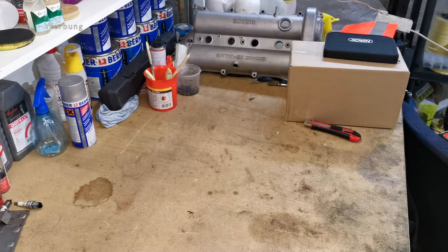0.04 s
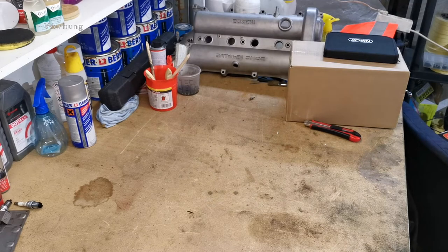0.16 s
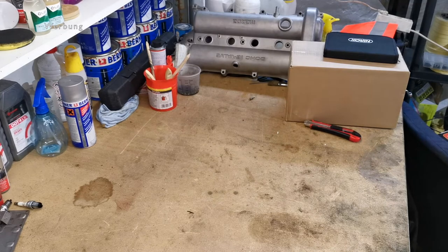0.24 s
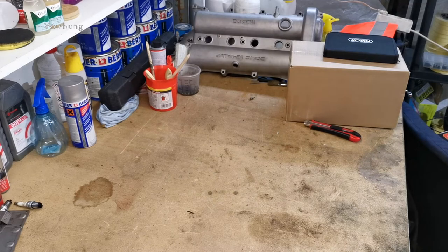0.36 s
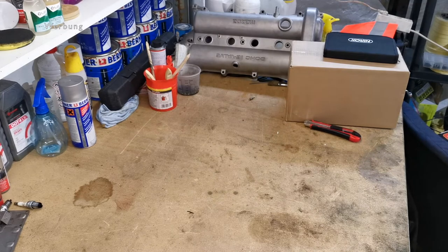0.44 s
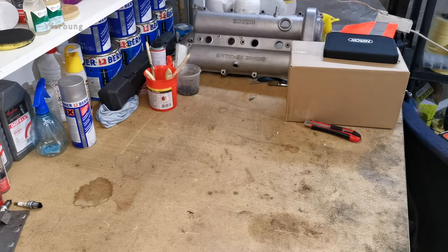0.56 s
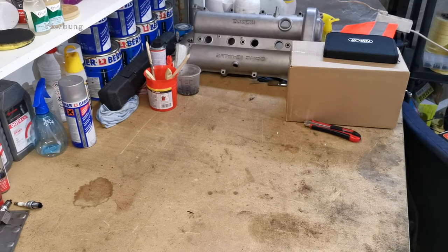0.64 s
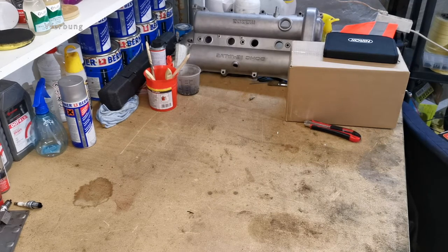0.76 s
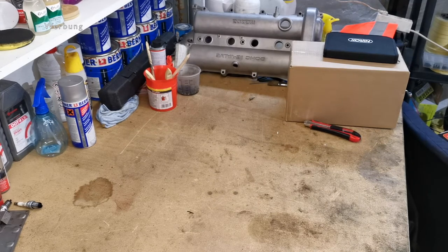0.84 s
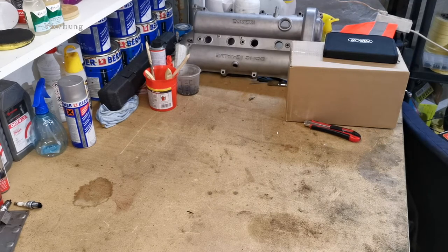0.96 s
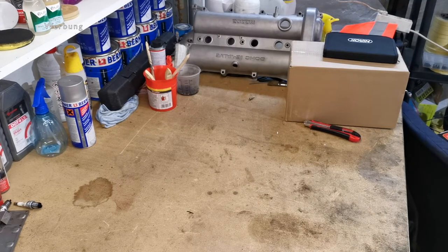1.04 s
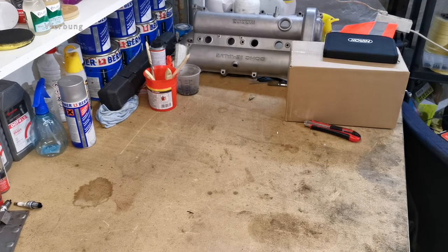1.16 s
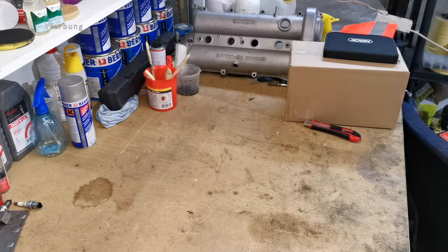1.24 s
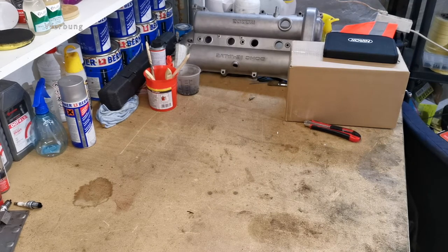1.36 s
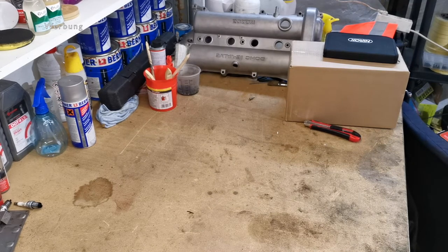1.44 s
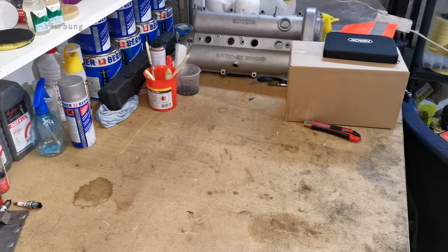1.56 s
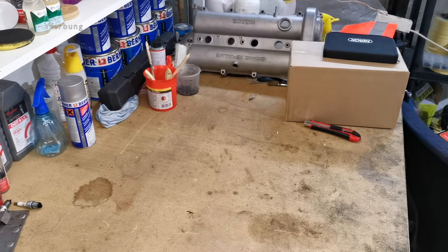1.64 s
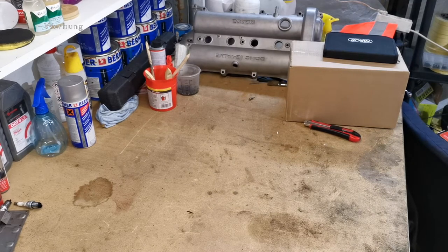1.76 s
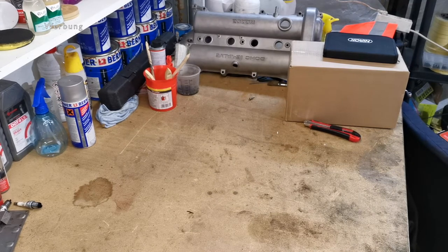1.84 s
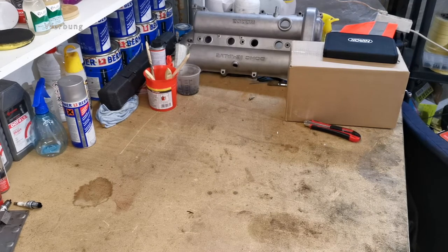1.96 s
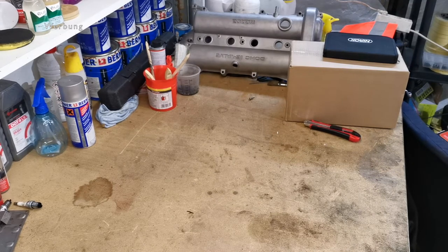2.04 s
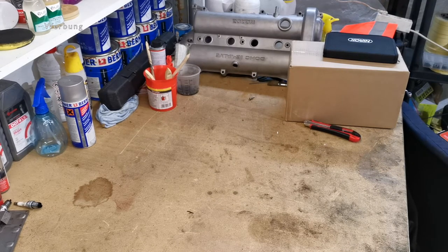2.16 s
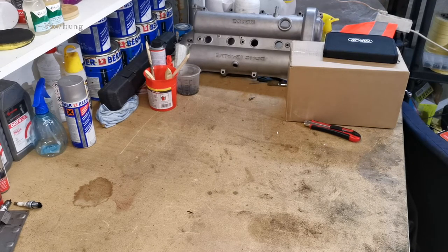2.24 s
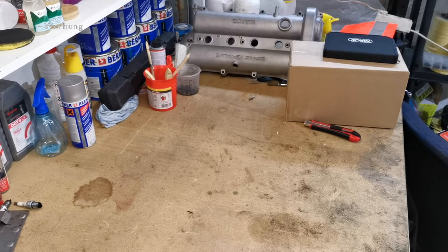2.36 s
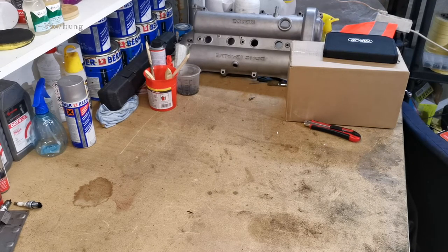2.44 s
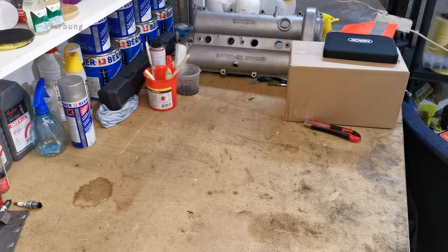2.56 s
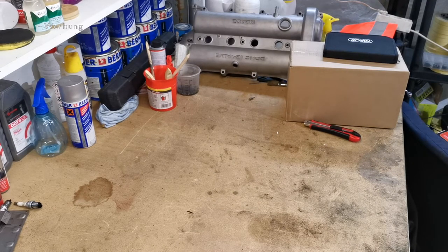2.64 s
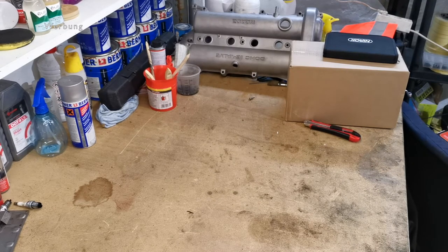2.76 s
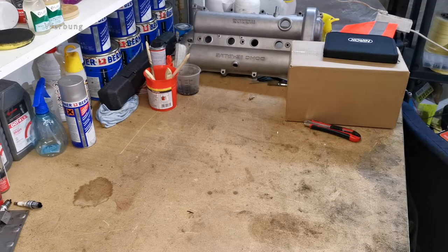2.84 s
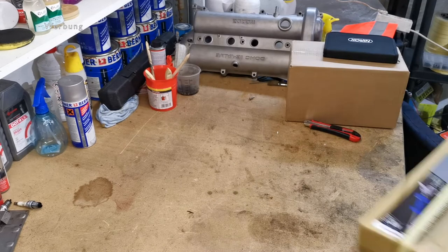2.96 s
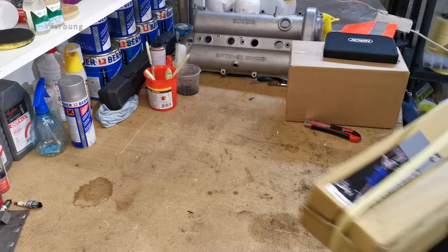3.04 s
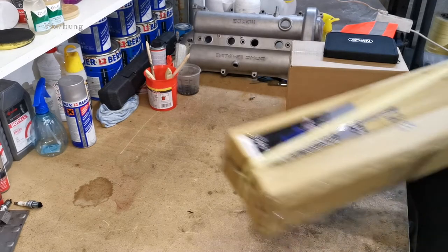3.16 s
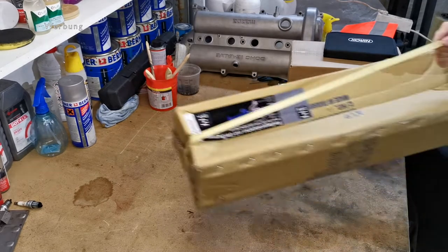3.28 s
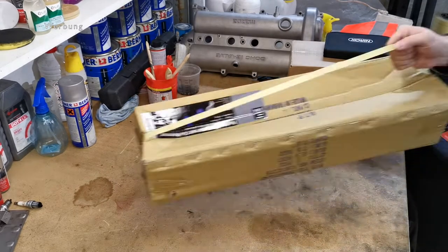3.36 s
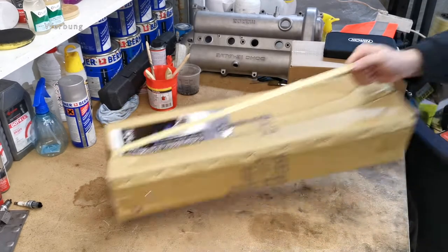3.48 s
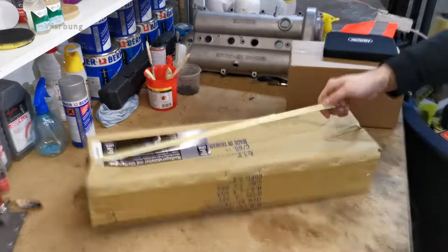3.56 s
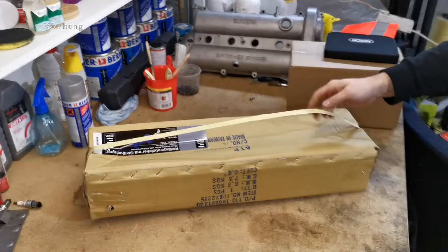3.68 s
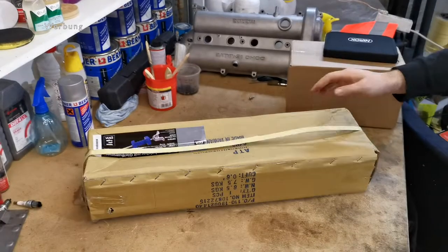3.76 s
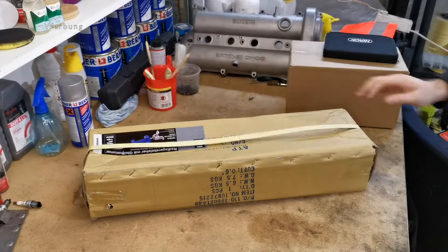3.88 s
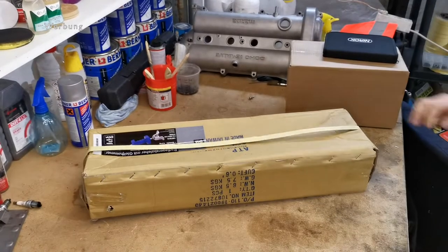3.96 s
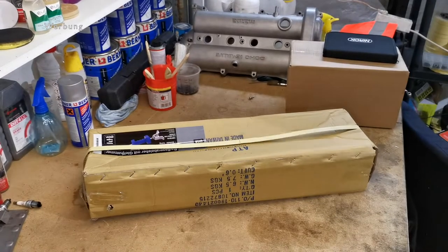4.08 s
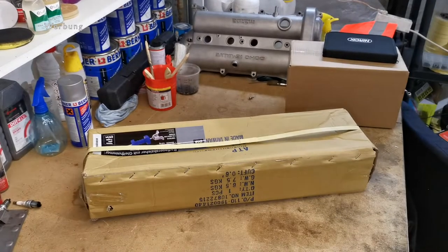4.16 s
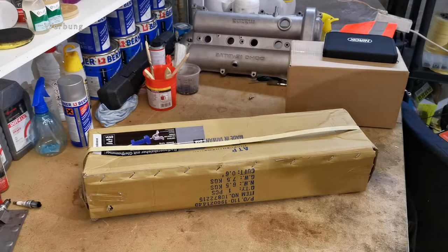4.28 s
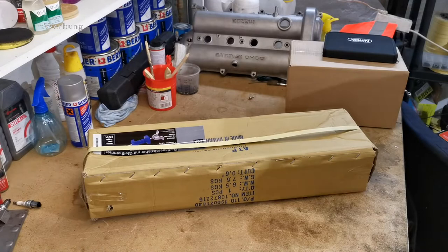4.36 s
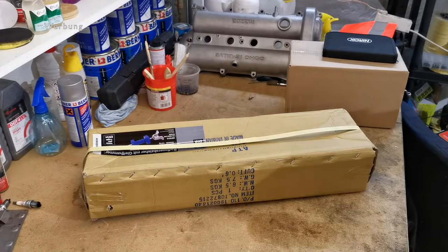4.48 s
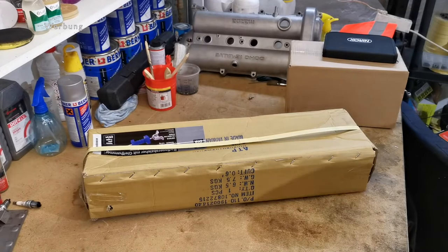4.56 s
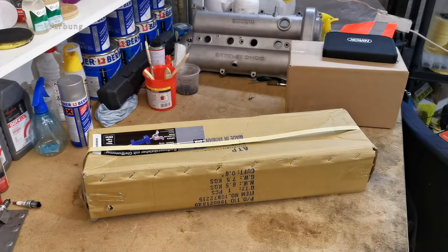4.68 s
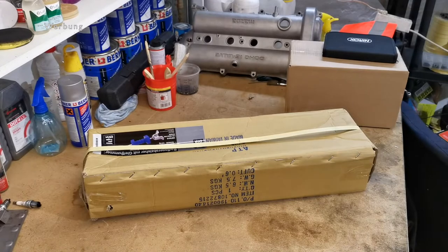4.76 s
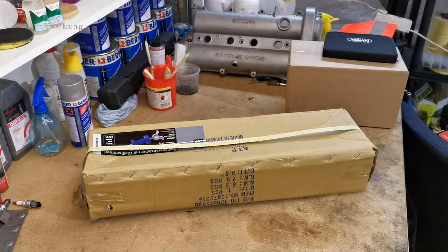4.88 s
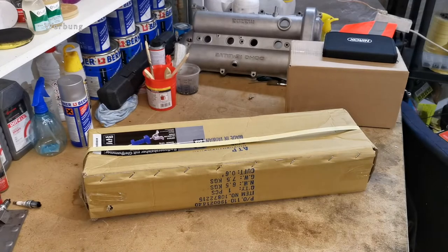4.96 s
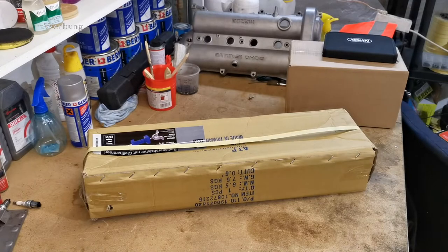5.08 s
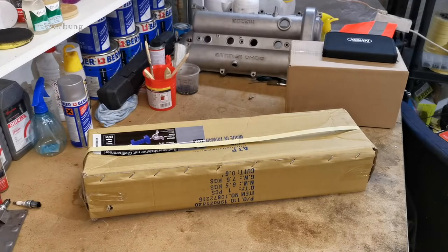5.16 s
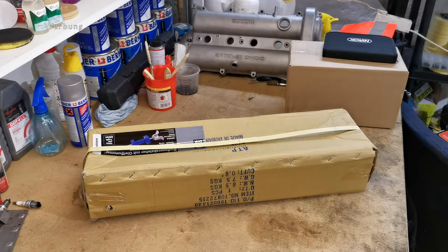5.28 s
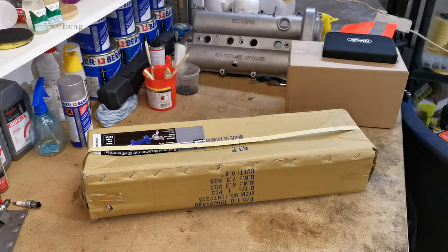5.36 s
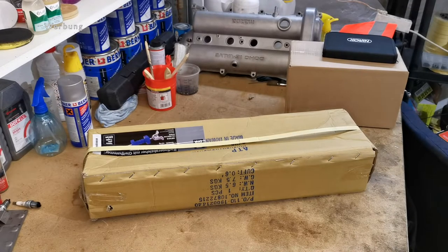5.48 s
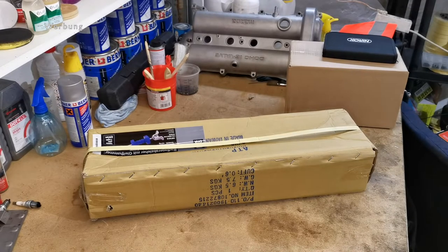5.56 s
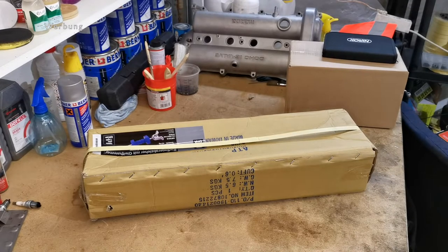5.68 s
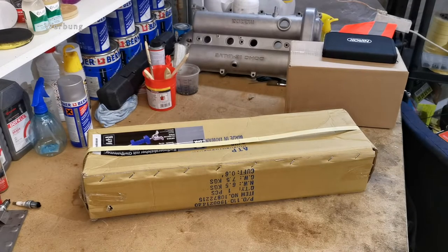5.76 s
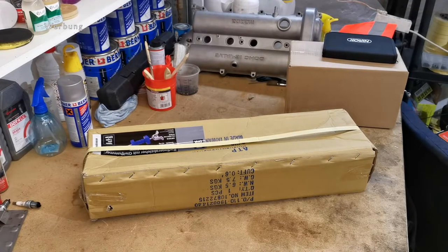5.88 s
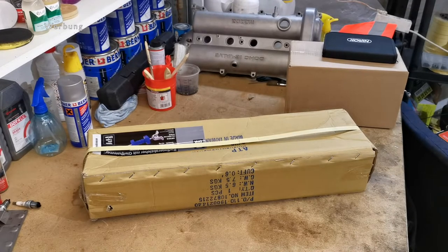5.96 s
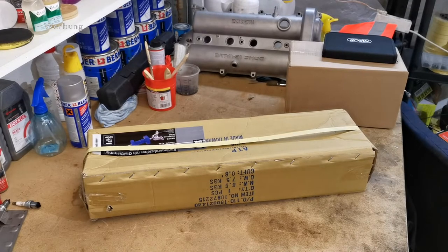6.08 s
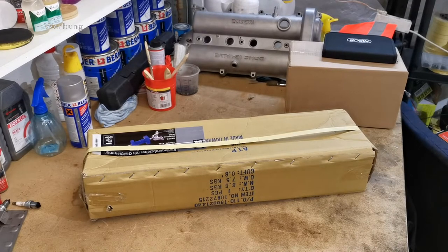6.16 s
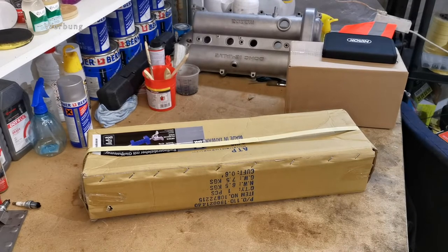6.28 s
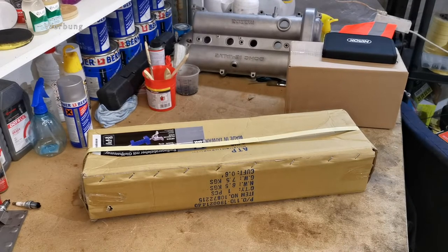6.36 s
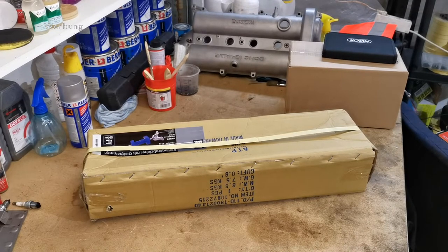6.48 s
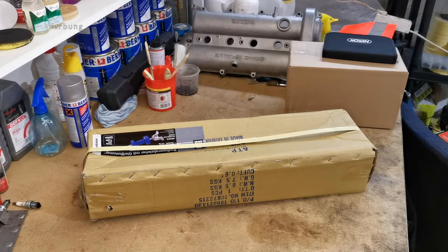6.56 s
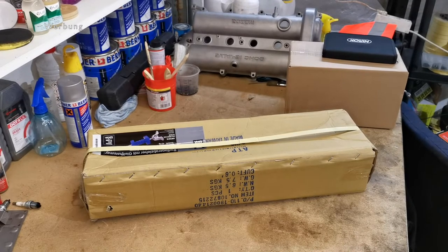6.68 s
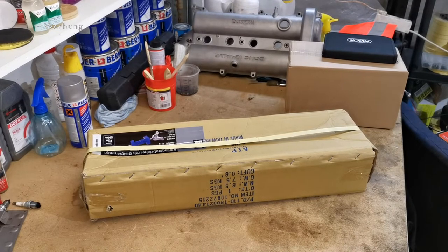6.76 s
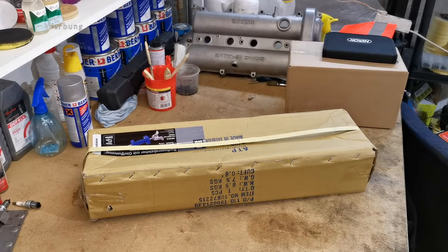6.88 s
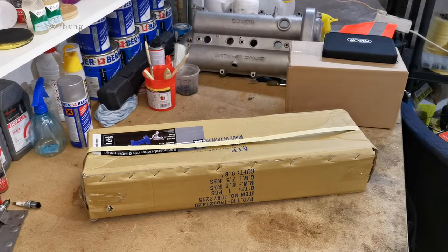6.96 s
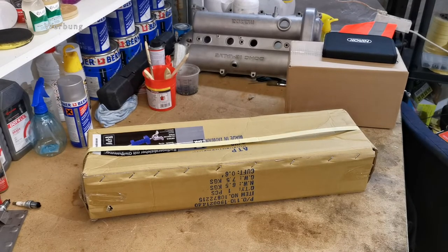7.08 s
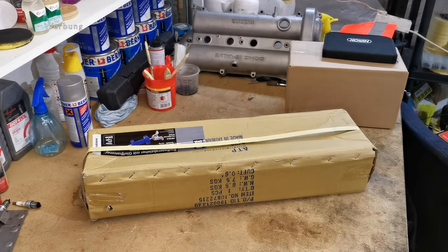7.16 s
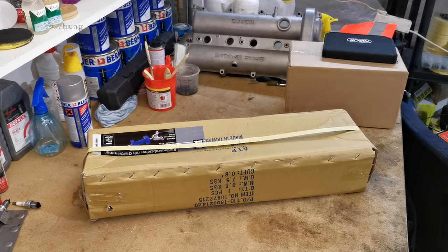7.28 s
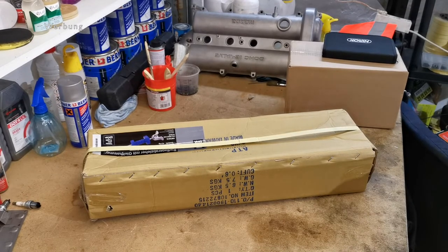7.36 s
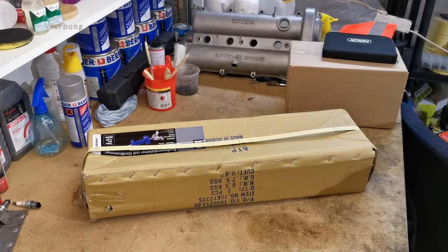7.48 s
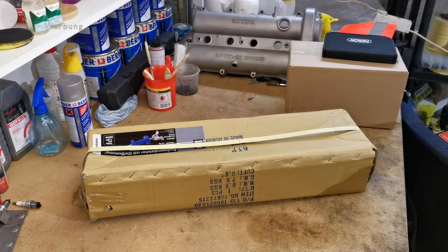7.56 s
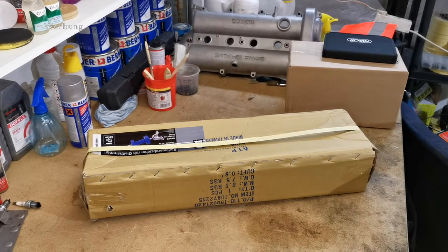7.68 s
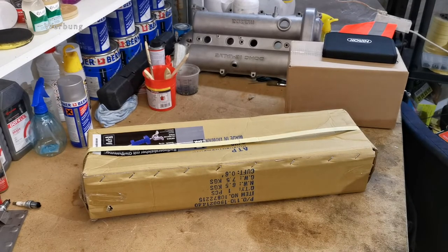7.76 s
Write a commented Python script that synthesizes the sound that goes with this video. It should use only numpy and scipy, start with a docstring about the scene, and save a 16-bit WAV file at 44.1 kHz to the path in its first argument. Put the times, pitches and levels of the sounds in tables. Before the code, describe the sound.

Close microphone in a quiet garage. Out of view, cardboard cartons scrape, bump hollowly and rustle for nearly three seconds, then fall almost silent. A long heavy carton slams onto a wooden workbench in a quick double blow, distorting the microphone and jangling tools. Cans ring faintly on. After a short lull, brighter cardboard rustling, sliding and crackling returns, then thins out.

```python
"""In a garage, cartons are dragged, bumped and rustled; a long heavy one lands on a wooden workbench,
one end first, bounces, and sets cans and tools ringing. Sliding is stick-slip noise through resonant
colours; knocks and blows are decaying noise bursts that excite damped modes; the cans ring on with slow
beats. A diffuse tail follows, over quiet air and low sway; the close microphone overloads on the landing."""
import sys
import numpy as np
from scipy import signal
from scipy.fft import rfft, irfft
from scipy.io import wavfile

SR = 44100
rng = np.random.default_rng(int(sys.argv[2]) if len(sys.argv) > 2 else 0)


def store_wav(level_fs):
    """Save 16-bit WAV to argv[1]."""
    pcm = np.round(np.clip(np.atleast_2d(level_fs), -1, 1) * 32767)
    wavfile.write(sys.argv[1], SR, pcm.T.astype(np.int16))


N = 345303

# Quiet garage air. Each row: frequency in Hz, relative spectral level in dB per Hz.
AIR_SPECTRUM = [(15, -19.5), (25, -2.5), (44, -30.5), (122, -17), (164, -32), (410, -18), (762, -23),
                (826, -20), (896, -22.5), (15500, -38)]
AIR_DB, SWAY_FLOOR_DB = -61, -79  # levels of the air and of the steady rumble
# Jolts that set the floor or the bench legs swaying under the microphone.
# Each row: start of full level in seconds, level in dB, hold in seconds, pitch in Hz.
JOLT_SWAYS = [(0.024, -65, 0.12, 43), (.76, -57, .37, 41), (1.39, -57, .1, 40), (2.064, -46, 0.098, 43),
              (2.815, -58, 0.03, 41), (3.61, -19, 0.022, 23), (3.62, -31, .04, 48), (3.95, -44, 0.14, 20),
              (4.6, -67, 0.25, 16.3), (4.995, -69, .05, 40), (5.77, -58, .01, 30), (6.145, -71, .05, 40),
              (6.5, -62, .01, 47), (7.703, -57.5, 0.027, 37)]
JOLT_RISE_S, JOLT_FALL_S = .05, 0.27  # each spans 20 dB

# Strokes of cardboard sliding. Each row: start of full level in seconds, hiss level in dB, rise in seconds
# per 20 dB, hold in seconds, fall in seconds per 20 dB, weight (hollow body over hiss) in dB.
SLIDING_STROKES = [(.01, -57, 0.03, 0.011, 0.16, 4), (.092, -43, 0.019, 0.011, 0.043, 3.5),
                   (.13, -56.5, .02, 0.014, 0.23, 5.5), (.38, -62, 0.049, 0, 0.92, 3),
                   (.564, -47.5, 0.0055, 0.0078, 0.042, -11), (.622, -49, 0.051, 0, 0.29, -7),
                   (.742, -36.5, 0.0034, 0.0011, 0.067, 9.5), (0.787, -43.5, 0.087, .13, 0.14, 0.5),
                   (0.945, -41.5, .08, 0.052, 0.12, -0.3), (1.07, -50, 0.049, 0.061, 0.14, 2.5),
                   (1.181, -42.5, .09, 0.026, 0.062, -.6), (1.245, -31.5, 0.021, 0.056, 0.22, -6.5),
                   (1.506, -40, 0.091, 0.15, 0.12, -.6), (1.63, -45, 0.076, 0.053, 0.11, 3),
                   (1.843, -36.5, 0.17, 0.0049, .21, -8), (1.946, -45, 0.012, 0, .08, -3),
                   (2.003, -35, 0.017, 0.031, 0.2, 5), (2.056, -31, 0.066, 0, 0.042, -13),
                   (2.153, -42, 0.1, 0, 0.37, -9), (2.43, -51, 0.21, 0.016, .13, -8),
                   (2.518, -49.5, 0.04, 0.067, 0.2, -3), (2.686, -50, .11, 0.034, 0.058, -5.5),
                   (2.73, -35, 0.017, 0, 0.048, -8.5), (2.765, -48.5, 0.025, 0.029, 0.17, -4.5),
                   (2.806, -46, .05, 0, 0.24, -8), (2.96, -57, 0.13, 0.018, 0.056, 5),
                   (3.02, -44, 0.014, 0.0067, 0.02, 3.5), (3.06, -66.5, .05, 0.085, 0.19, -1),
                   (3.29, -71, 0.086, 0, 0.2, 1), (3.381, -60, 0.0062, 0.01, .095, 8.5),
                   (3.501, -64, 0.045, 0, 0.013, 14.5), (4.857, -48.5, 0.021, 0.014, .05, -8.5),
                   (4.913, -33, 0.041, 0.064, 0.13, -10.5), (4.997, -30, 0.046, .03, .11, -19),
                   (5.061, -24.5, 0.075, 0.027, 0.13, -19.5), (5.172, -30.5, 0.17, 0, 0.11, -11.5),
                   (5.339, -29.5, 0.25, 0, 0.17, -15), (5.478, -43, .012, 0.027, .11, -17),
                   (5.534, -41.5, 0.23, 0.052, 0.28, -7), (5.707, -37, 0.061, 0.027, 0.19, -6),
                   (5.865, -46, 0.26, 0.16, .3, -29), (6.071, -31, 0.38, 0.21, 0.16, -9.5),
                   (6.364, -39, 0.26, 0.18, 0.27, -7.5), (6.61, -44, 0.1, 0, 0.13, -13),
                   (6.715, -40, 0.0072, 0, 0.052, -15.5), (6.838, -51.5, 0.063, 0.089, 0.13, -0.5),
                   (7.113, -59, 0.54, 0.008, .25, -17), (7.245, -43, 0.061, 0, 0.16, -14),
                   (7.315, -53.5, 0.015, 0, 0.27, -3.5), (7.537, -53.5, 0.39, 0, 0.19, -3),
                   (7.676, -45, 0.054, .15, .11, -6)]
# A heavier stroke scrapes more coarsely and thuds more in the floor: dB over hiss at weight 0, dB per dB.
SCRAPE_DB, SCRAPE_PER_WEIGHT, THUD_DB, THUD_PER_WEIGHT = -0.25, 0.41, -13, 1.5
# Fine hiss of sliding. Each row: frequency in Hz, relative spectral level in dB per Hz.
HISS_SPECTRUM = [(1410, -27), (2400, 1), (4890, -1.5), (5800, -0.5), (7740, -5), (8710, -5), (10100, -11),
                 (14500, -19), (15500, -19)]
# Coarser scrape of sliding. Each row: frequency in Hz, relative spectral level in dB per Hz.
SCRAPE_SPECTRUM = [(350, -58.5), (600, -1.5), (758, -2), (1210, 1), (1420, 1), (2600, -7.5), (3380, -42),
                   (5720, -120)]
# Carton walls under rubbing. Each row: frequency in Hz, relative spectral level in dB per Hz.
WALL_SPECTRUM = [(94, -37.5), (160, -11), (259, -2.5), (505, -4), (599, -3.5), (650, -4), (840, -38),
                 (1430, -120)]
# Floor under the cartons. Each row: frequency in Hz, relative spectral level in dB per Hz.
FLOOR_SPECTRUM = [(45, -28), (70, -2), (130, -2), (190, -27.5)]
# Small patches of corrugated board that ring when they slip. Each entry: frequency in Hz.
FLUTE_PITCHES = [779, 954, 1160, 1460, 1590, 2180]
# Gain of the top treble in the hiss. Each row: time in seconds, gain in dB.
SHEEN_GAINS = [(0, .6), (.6, 1), (.9, -.6), (1.26, -4), (1.5, 4.5), (1.9, -7), (2.1, 2.5), (2.5, -1),
               (2.75, -15), (2.93, -7), (3.298, 0), (4.9, -0.5), (5.3, 4.5), (5.7, 0), (6.1, 1),
               (6.499, 3.3), (7, -5.3), (7.399, 6.7), (7.83, -3.5)]
SHEEN_HZ = 10000  # the gain acts above this
# Soft rustles as things settle. Each row: centre in seconds, level in dB, spread in seconds.
SETTLING_RUSTLES = [(3.96, -55, 0.06), (4.066, -50.5, 0.018), (4.17, -55.5, 0.025), (4.48, -55, 0.0055)]
# Carton walls groaning at one pitch while they stick and slide.
# Each row: centre in seconds, level in dB, pitch in Hz, spread in seconds, 60 dB decay in seconds.
WALL_GROANS = [(1.056, -37, 2470, 0.0046, 0.022), (1.52, -51, 277.7, 0.015, 0.18),
               (1.675, -39.5, 390, .015, 0.28), (1.70, -36, 455, 0.016, 0.5),
               (1.76, -45, 469.4, 0.014, 0.59), (5.07, -38.5, 1480, 0.031, 0.033),
               (5.16, -38, 382.4, 0.014, 0.33), (6.2, -40.5, 1390, 0.058, 0.057),
               (6.85, -50, 1100, .018, 0.033), (6.91, -57, 1060, .035, .02), (7.69, -44, 410, 0.026, 0.044)]

# Knocks and snaps of cartons.
# Each row: start in seconds, crack level in dB, thump level in dB, hollow pitch in Hz, length in seconds.
CARTON_KNOCKS = [(0.086, -34.5, -31.5, 280, 0.023), (0.194, -45, -48, 271, 0.036),
                 (0.251, -43, -57, 195, 0.029), (0.365, -48.5, -56, 470, 0.032),
                 (0.412, -49, -54, 370, 0.057), (0.444, -47, -58, 570, 0.051),
                 (0.563, -51, -53, 340, 0.035), (0.616, -53, -57, 402, 0.016),
                 (0.627, -52, -58, 460, 0.019), (0.684, -42.5, -47, 510, 0.072),
                 (0.7417, -24.5, -16.5, 533, 0.038), (0.888, -32.5, -32, 392, 0.026),
                 (0.9455, -32, -27.5, 272, 0.072), (1.053, -30.5, -37, 243, 0.025),
                 (1.143, -34, -54, 315, 0.032), (1.1743, -34.5, -29.5, 256, 0.024),
                 (1.249, -50, -26, 264, 0.02), (1.948, -32, -40, 736, 0.034),
                 (2.0004, -44, -24, 204, 0.022), (2.051, -28, -30, 340, 0.013),
                 (2.507, -51, -48.5, 204, 0.036), (2.732, -56, -36.5, 263, 0.04),
                 (3.0205, -37, -35, 626, 0.036), (3.23, -54, -62, 290, 0.039),
                 (3.289, -52, -38, 390, 0.023), (3.378, -50, -40, 296, 0.038),
                 (3.4236, -47, -50, 258, 0.03), (3.47, -54, -46, 424, 0.028), (3.892, -31, -43, 183, 0.045),
                 (4.8757, -33.5, -46.5, 312, 0.037), (4.916, -32.5, -48, 686, 0.12),
                 (4.99, -29, -52, 720, 0.03), (5.027, -28, -45, 385, 0.017), (5.045, -36, -52, 704, 0.022),
                 (5.091, -28, -51, 570, 0.04), (5.12, -26, -39, 490, 0.05), (5.238, -28.5, -58, 290, 0.048),
                 (5.2977, -26.5, -44, 272, 0.081), (5.359, -28, -56, 694, 0.041),
                 (5.412, -28.5, -43, 710, 0.074), (5.479, -25, -50, 710, 0.022),
                 (5.585, -29.5, -42.5, 254, 0.013), (5.707, -34, -32.5, 271, 0.025),
                 (5.847, -34, -52, 377, 0.03), (6.716, -35, -61.5, 253, 0.021),
                 (7.236, -42.5, -53, 463, 0.043), (7.312, -46, -49, 390, 0.02),
                 (7.523, -38.5, -49, 297, 0.053), (7.665, -45.5, -38.5, 416, 0.06)]
# Modes of a hollow carton. Each row: ratio to its pitch, relative drive in dB, 60 dB decay in seconds.
HOLLOW_MODES = [(.38, -9, .09), (.7, -7, .06), (1, 0, .1), (1.12, -5, .08), (1.9, -10, .04)]
# Crack at a contact, also used for settling. Each row: frequency in Hz, relative level in dB per Hz.
CRACK_SPECTRUM = [(300, -20), (1000, 9), (2000, 5), (5000, -1.5), (8500, -4.5), (11000, -16.5),
                  (16000, -22)]

# Blows of the landing. Each row: start in seconds, crack level in dB, thump level in dB,
# jangle level in dB, length in seconds, contact hardness (low-pass cutoff of the thump) in Hz.
LANDING_BLOWS = [(3.513, -15, -7.5, -39, 0.086, 800), (3.543, -26, 12, -42.5, 0.044, 606),
                 (3.553, -6, 11, -32, 0.075, 600), (3.567, 0.1, 7.5, -29, 0.089, 920),
                 (3.588, -8, -1, -30, 0.073, 900), (3.61, -16, -8, -32, 0.12, 800),
                 (3.666, -23, -10, -36, 0.37, 915), (3.684, -19.5, -11.5, -27, 0.036, 1170),
                 (3.695, -17, -3.5, -10.5, 0.09, 600), (3.707, -19.5, -9.5, -11, 0.026, 900),
                 (3.717, -8, -9.5, -40, 0.049, 910)]
# Bench top and heavy carton. Each row: frequency in Hz, relative drive in dB, 60 dB decay in seconds.
BENCH_MODES = [(93.9, -14.5, 0.23), (122.4, -22.5, .06), (200, -5, 0.083), (252.7, -3.5, 0.063),
               (290.5, 1, 0.046), (371, -2, 0.062), (424, -5.5, 0.029), (518, -5.5, 0.037),
               (526, -4, 0.056), (656, -4, 0.035), (804, -3, .025), (1000, -10, 0.042), (1185, -5, 0.019),
               (1370, 3, .02)]
# Tools that jangle on the bench. Each row: frequency in Hz, relative drive in dB, 60 dB decay in seconds.
TOOL_MODES = [(2170, -3.5, 0.069), (3180, -18.5, 0.038), (4560, -13.5, .05), (5047, -13, 0.2),
              (5960, -4, .02), (6100, 4, 0.031), (8150, -10, 0.018)]
# Cans and shelf that ring on after the landing.
# Each row: frequency in Hz, level in dB, 60 dB decay in seconds, beat rate in Hz.
CAN_MODES = [(122, -55, 3.5, .8), (253, -45, 2.3, .7), (420, -57, 1.8, 2.1), (834, -44, 2.1, .7),
             (2724, -31, .9, 1.3)]
CANS_S = 3.6  # when they begin to ring

ROOM_T60_S, ROOM_TOP_T60_S, BOOM_T60_S = 0.4, 0.27, 1.11  # 60 dB decays of lows, treble and boom
BOOM_DB = -37.5  # boom before decay, against the tail's unit noise
ROOM_DB, RUB_ROOM_DB = -7.5, -16  # tail gain for hits and for rubbing
TOP_HZ = 15700
CONTROL_STEP = 64  # samples between points of an envelope


def undb(db):
    """Decibel law: 20 dB is a factor of ten in amplitude."""
    return 10 ** (np.asarray(db) / 20)


def unit(x):
    """Normalisation to unit root-mean-square amplitude."""
    return x / np.sqrt(np.mean(x ** 2))


def decay(t, t60):
    """Exponential damping: amplitude falls 60 dB in t60 seconds."""
    return np.exp(-np.log(1000) * t / t60)


def colour(x, table):
    """Minimum-phase filtering: the folded cepstrum of the log gain yields a causal, unit-energy response."""
    hz, db = np.transpose(table)
    size = 8192
    bins_hz = np.arange(size // 2 + 1) * SR / size
    gain_db = np.interp(np.log(bins_hz + 1), np.log(hz), db)
    cepstrum = irfft(np.log(undb(gain_db)))
    cepstrum[1:size // 2] *= 2
    cepstrum[size // 2 + 1:] = 0
    taps = irfft(np.exp(rfft(cepstrum)))[:size // 2]
    return signal.fftconvolve(x, taps / np.sqrt(np.sum(taps ** 2)))[:len(x)]


def ring(x, hz, t60):
    """Modal resonance: one damped mode, which a burst of noise rings to about its own size."""
    pole = np.exp(2j * np.pi * hz / SR - np.log(1000) / (t60 * SR))
    return signal.lfilter([1], [1, -pole], x + 0j).imag * np.sqrt(2 / (SR / 100))


def burst(length):
    """Impulsive excitation: noise that starts at once and dies 60 dB within length."""
    t = np.arange(SR // 4) / SR
    return rng.standard_normal(len(t)) * decay(t, max(length, 1e-3))


def add(out, s, x):
    """Superposition: sounds sum linearly, here x from s seconds on."""
    i = int(s * SR)
    out[i:i + len(x)] += x[:N - i]


def swell(s, spread):
    """Gaussian envelope: a soft rise and fall around a moment."""
    return np.exp(-.5 * ((np.arange(N) / SR - s) / spread) ** 2)


def gesture(s, rise, hold, fall):
    """Exponential envelope: climbs 20 dB per rise to full level at s, holds, drops 20 dB per fall."""
    # one row for each gesture
    t = np.arange(0, N + CONTROL_STEP, CONTROL_STEP) / SR - np.reshape(s, (-1, 1))
    rise, hold, fall = (np.maximum(np.reshape(v, (-1, 1)), 1e-3) for v in (rise, hold, fall))
    return 10. ** (np.minimum(t, 0) / rise - np.maximum(t - hold, 0) / fall)


def envelope(db, gains):
    """Incoherent summation: overlapping gestures add in power."""
    power = undb(db) ** 2 @ gains ** 2
    return np.interp(np.arange(N), CONTROL_STEP * np.arange(len(power)), np.sqrt(power))


def background():
    """Ambient noise and damped sway: quiet air, a faint resonant rumble, a low tone after each jolt."""
    t = np.arange(N) / SR
    rumble = unit(ring(ring(rng.standard_normal(N), 39, 0.14), 41, .5))
    phases = 2 * np.pi * rng.random(len(JOLT_SWAYS))
    sway = np.zeros(N)
    for phase, (s, db, hold, hz) in zip(phases, JOLT_SWAYS):
        tone = np.sqrt(2) * np.sin(2 * np.pi * hz * t + phase)
        sway += tone * envelope([db], gesture(s, JOLT_RISE_S, hold, JOLT_FALL_S))
    air = undb(AIR_DB) * colour(rng.standard_normal(N), AIR_SPECTRUM)
    return air + undb(SWAY_FLOOR_DB) * rumble + sway


def slips(rate, spread_db, smooth):
    """Stick-slip friction: fibres let go at random (rate per second), unevenly, over even friction noise."""
    size = undb(spread_db * np.minimum(rng.exponential(size=N), 3))
    size = size * (rng.random(N) < rate / SR)
    tail = signal.lfilter([1], [1, -np.exp(-1 / (0.0029 * SR))], size)  # each slip lasts a moment
    power = np.clip(smooth, 0, 1) + np.clip(1 - smooth, 0, 1) * unit(tail) ** 2
    return rng.standard_normal(N) * np.sqrt(power)


def rubbing():
    """Friction-driven radiation: one sliding contact hisses, scrapes and drives carton walls and floor."""
    s, hiss_db, rise, hold, fall, weight_db = np.transpose(SLIDING_STROKES)
    strokes = gesture(s, rise, hold, fall)
    fine, coarse = slips(300, 3.5, .7), slips(120, 3.6, .65)
    # some slips chirp in two small stiff patches of tape
    chirps = sum(0.2 * unit(ring(slips(59, 1.6, .05), hz, .006)) for hz in (5800, 8700))
    flutes = unit(sum(unit(ring(slips(30, 1.2, 0.22), hz, 0.024)) for hz in FLUTE_PITCHES))
    scrape = 0.87 * colour(0.69 * fine + 0.87 * coarse, SCRAPE_SPECTRUM) + 0.4 * flutes
    hiss = colour(fine, HISS_SPECTRUM) + chirps
    top = signal.sosfilt(signal.butter(4, SHEEN_HZ, "high", fs=SR, output="sos"), hiss)
    sheen_db = np.interp(np.arange(N) / SR, *np.transpose(SHEEN_GAINS))
    hiss = hiss + top * (undb(sheen_db) - 1)
    layers = ((hiss, 0),
              (scrape, SCRAPE_DB + SCRAPE_PER_WEIGHT * weight_db),
              (colour(coarse, WALL_SPECTRUM), weight_db),
              (colour(coarse, FLOOR_SPECTRUM), THUD_DB + THUD_PER_WEIGHT * weight_db))
    slide = sum(x * envelope(hiss_db + db, strokes) for x, db in layers)
    rustles = sum(undb(db) * swell(at, spread) for at, db, spread in SETTLING_RUSTLES)
    settle = colour(coarse, CRACK_SPECTRUM) * rustles
    groan = np.zeros(N)
    for at, db, hz, spread, t60 in WALL_GROANS:
        groan += undb(db) * swell(at, spread) * unit(ring(coarse, hz, t60))
    return slide + settle + groan


def knocks():
    """Impact excitation: each knock ticks and cracks at the contact and booms briefly in the hollow carton."""
    crack, thump = np.zeros(N), np.zeros(N)
    for s, crack_db, thump_db, hz, length in CARTON_KNOCKS:
        tick = 0.18 * burst(0.0022)
        add(crack, s, undb(crack_db) * (burst(length) + tick))
        # each mode is driven by a burst of twice the length
        boom = sum(undb(db) * ring(burst(2 * length), ratio * hz, t60) for ratio, db, t60 in HOLLOW_MODES)
        add(thump, s, undb(thump_db) * boom / np.max(np.abs(boom)))
    return colour(crack, CRACK_SPECTRUM) + thump


def struck(modes, length):
    """Modal superposition: a separate noise burst excites each damped mode."""
    return sum(undb(db) * ring(burst(length), hz, t60) for hz, db, t60 in modes)


def landing():
    """Contact stiffness and modal response: each blow cracks, drives the bench and shakes the tools on it."""
    crack, body = np.zeros(N), np.zeros(N)
    for s, crack_db, thump_db, jangle_db, length, hard_hz in LANDING_BLOWS:
        add(crack, s, undb(crack_db) * burst(length))
        thump, jangle = struck(BENCH_MODES, length), struck(TOOL_MODES, length)
        # a softer contact leaves the high modes out
        thump = signal.lfilter(*signal.butter(2, hard_hz, fs=SR), thump)
        for sound, db in ((thump, thump_db), (jangle, jangle_db)):
            add(body, s, undb(db) * sound / np.max(np.abs(sound)))
    return colour(crack, CRACK_SPECTRUM) + body


def cans():
    """Beating: each long ring is a close pair of modes whose sum waxes and wanes slowly."""
    t = np.maximum(np.arange(N) / SR - CANS_S, 0)  # held at zero, hence silent, until the start
    out = np.zeros(N)
    for hz, db, t60, beat in CAN_MODES:
        pair = np.sin(2 * np.pi * hz * t) - .5 * np.sin(2 * np.pi * (hz + beat) * t)
        out += undb(db) * decay(t, t60) * pair
    return out


def room(x, wet_db):
    """Reverberation: a diffuse tail whose treble dies sooner, with a faint low boom that stays longer."""
    t = np.arange(SR + SR // 2) / SR
    noise = rng.standard_normal(len(t))
    low = signal.lfilter(*signal.butter(1, 2500, fs=SR), noise)
    boom = unit(signal.lfilter(*signal.butter(1, 500, fs=SR), rng.standard_normal(len(t))))
    parts = (low, ROOM_T60_S), (noise - low, ROOM_TOP_T60_S), (undb(BOOM_DB) * boom, BOOM_T60_S)
    tail = sum(part * decay(t, t60) for part, t60 in parts)
    tail = tail * np.minimum(t / 0.0055, 1)  # the tail builds up over 5.5 ms
    return x + undb(wet_db) * signal.fftconvolve(x, tail / np.sqrt(np.sum(tail ** 2)))[:N]


def scene():
    """Linear superposition of all sources, with reverberation on the hits and the rubbing."""
    hits = room(knocks() + landing(), ROOM_DB)
    # panels this small radiate no deep bass
    hits = signal.sosfilt(signal.butter(4, 75, "high", fs=SR, output="sos"), hits)
    return (room(rubbing(), RUB_ROOM_DB) + hits + cans() + background())[None]


def record(dry):
    """Overload and band limiting: the input clips hard near full scale, and the top is cut."""
    cut = signal.ellip(8, .2, 70, TOP_HZ, fs=SR, output="sos")
    return signal.sosfilt(cut, np.clip(dry, -.92, .92))


dry = scene()
out = record(dry)
store_wav(out)
```